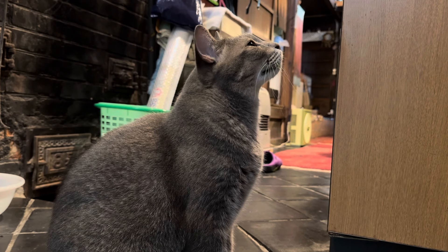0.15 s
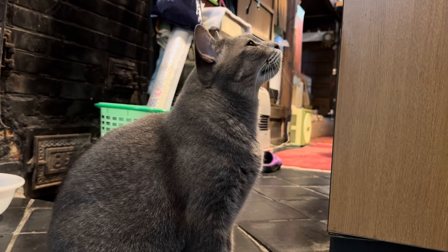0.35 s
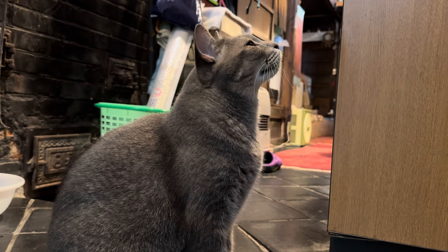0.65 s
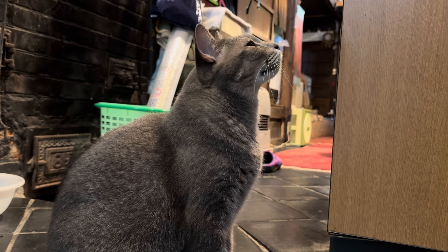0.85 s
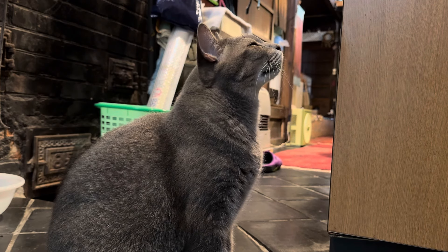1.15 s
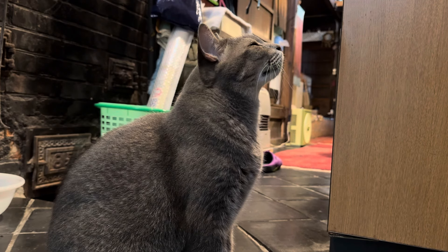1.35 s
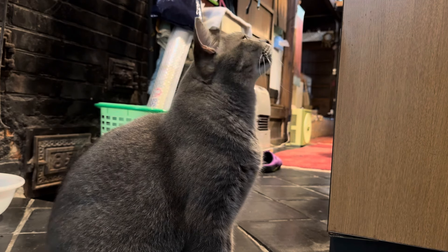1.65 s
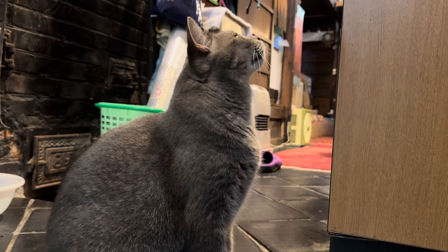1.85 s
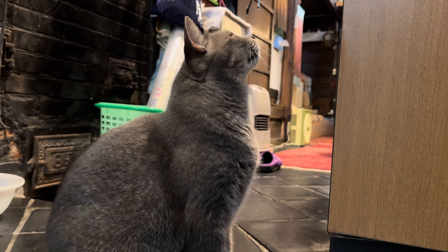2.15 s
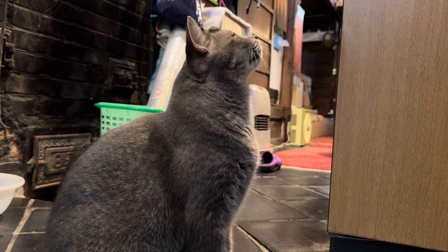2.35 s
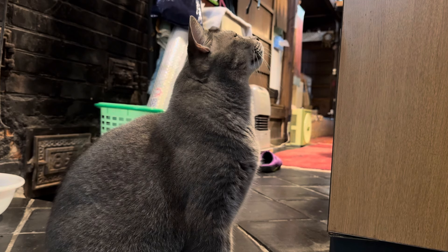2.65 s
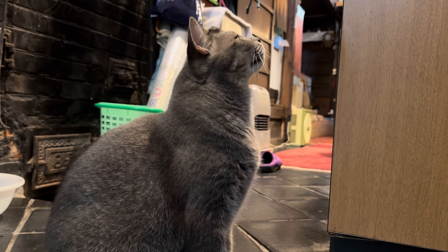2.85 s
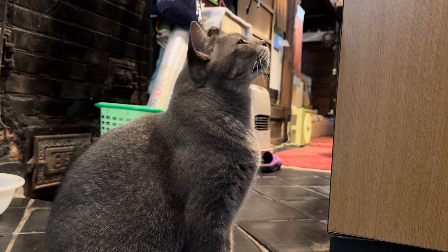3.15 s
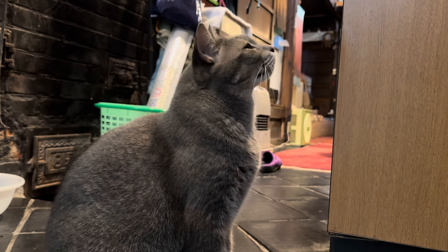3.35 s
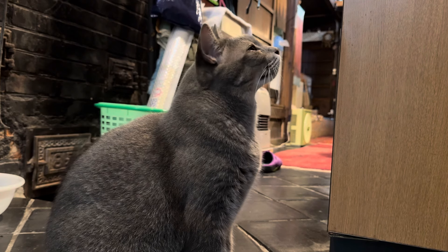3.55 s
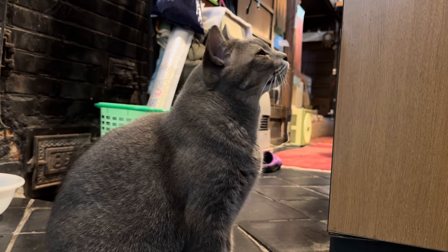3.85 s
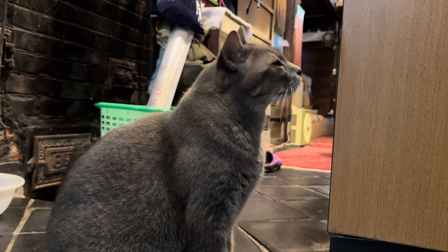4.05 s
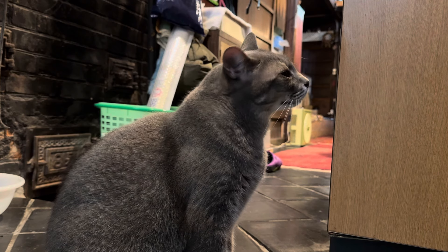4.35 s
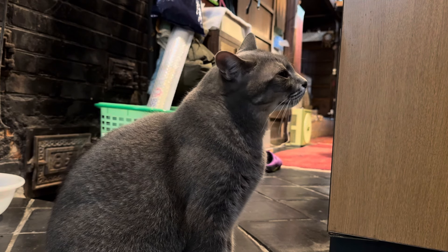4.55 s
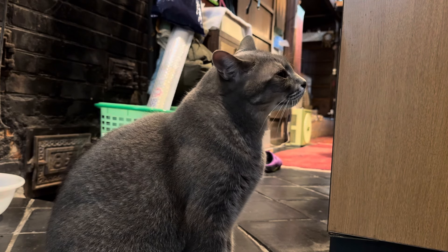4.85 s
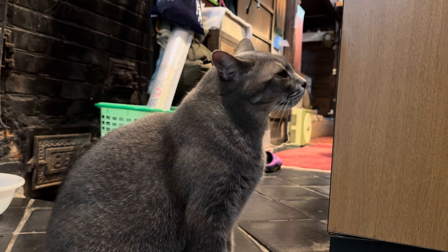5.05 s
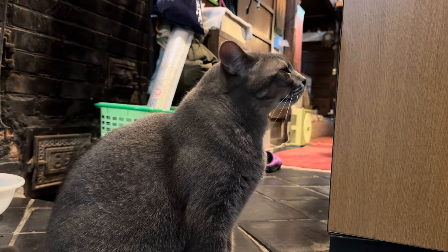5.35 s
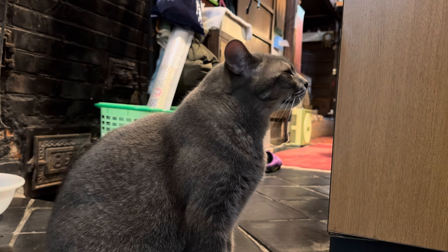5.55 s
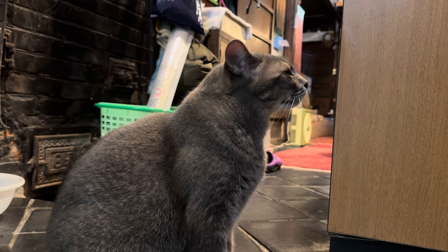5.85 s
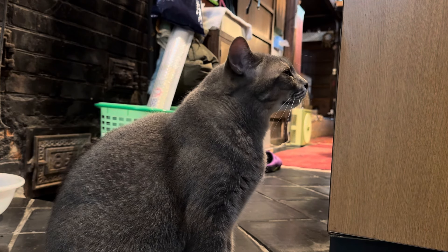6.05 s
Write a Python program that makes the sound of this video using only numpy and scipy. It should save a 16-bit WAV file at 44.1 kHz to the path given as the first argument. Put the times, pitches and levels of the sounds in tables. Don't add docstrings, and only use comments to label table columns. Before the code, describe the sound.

Close, low-placed stereo phone pickup in a small hard-surfaced kitchen with soft fridge hum. Two quick light wooden contacts, a faint sleeve hiss and thin distant chirps come first; then several woody knocks with low thumps and a jerky drawer slide. Crisp plastic film follows, crackling in bursts, popping and snapping, finally ripped in thick clusters with a brief lull near the end.

```python
import sys
import numpy as np
from scipy import signal
from scipy.fft import rfft, irfft, next_fast_len
from scipy.io import wavfile
from scipy.ndimage import uniform_filter1d, map_coordinates

SR = 44100
rng = np.random.default_rng(int(sys.argv[2]) if len(sys.argv) > 2 else 0)


def volts_from_db(level):
    exponent = np.asarray(level, float) / 20
    return 10 ** exponent


def store_pcm(level_fs):
    pcm = np.round(np.clip(level_fs, -1, 1) * 32767).astype(np.int16)
    wavfile.write(sys.argv[1], SR, np.atleast_2d(pcm).T)


N = 273420

# frequency in Hz, level in dB per Hz.
AIR = [(15, -60), (25, 2), (40, -0.5), (76, -3.5), (242, -6), (270, -25.5), (301, -2), (326, -10.5),
       (607, -19.5), (659, -13.5), (3080, -27), (5000, -30.5), (6050, -31.5), (6740, -26.5), (16000, -39)]
# frequency in Hz, level in dB.
FRIDGE_LINES = [(53.8, -92), (301.5, -80.5), (1389, -80.5)]

# start in seconds, clack in dB, then catch, rattle and tick in dB above it.
SET_DOWN = [
    (0.099, -46.5, -4, 0, -9),
    (0.103, -43, 1, -14.5, -14),
    (0.124, -46.5, -34, -10, -25),
    (0.287, -50, -33, -1.5, -7),
    (0.299, -51, -10.5, -9, -6.5),
    (0.311, -49.5, -6, -1, -17),
    (0.329, -48.5, -5, -10, -12),
]
# start in seconds, clack in dB, then edge, rattle and tick in dB above it.
KNOCKS = [
    (1.371, -36.5, 2.5, -4.5, -32),
    (1.375, -30, -10, -19, -44),
    (1.405, -37, -6, -15, -47),
    (1.68, -36.5, -6, -16.5, -31),
    (1.715, -54, -18, -30, -12),
    (1.941, -41, -8.5, -28, -33),
    (1.964, -50.5, -9, -24, -59),
    (2.272, -41.5, -10, -9.5, -33),
]
# frequency in Hz, level in dB per Hz.
SHELF_CLACK = [(250, 5), (360, 7), (500, -23), (800, 9), (1000, -4), (1500, -2), (2300, 5), (3200, -34),
               (6000, -25)]
DOOR_CLACK = [(250, 2.5), (400, 2), (520, -5), (650, 3.5), (800, -0.5), (1000, 4), (1200, -5), (1600, -2),
              (2300, -22), (3200, -19), (6000, -36)]
# centre in Hz, width in Hz, level in dB.
CATCH = [(870, 170, 1), (1405, 43, 11.8)]
DOOR_EDGE = [(1830, 780, 0), (2400, 760, 2)]
# frequency in Hz, level in dB per Hz.
RATTLE = [(1500, -0.5), (2800, -3.5), (5000, -3.5), (8000, -10.5), (12000, -60)]
SET_DOWN_S, KNOCK_S, THUD_S = 0.033, 0.2, 0.027

# start in seconds, boom in dB, then board, edge and ring in dB above it.
SHELF_THUDS = [
    (0.103, -62, 0, 16.5, 3),
    (0.113, -47, -3, -10, -15),
    (0.14, -71, 6, -3, -13),
    (0.299, -40, -2.5, 2, -5),
    (0.326, -51.5, 3, 4, 10),
    (0.345, -63.5, 1.5, -6, 3),
]
# centre in Hz, width in Hz, level in dB.
SHELF = [
    [(82.7, 28, 0)],
    [(145, 80, 0)],
    [(215, 73, 16), (357, 60, -13)],
    [(270, 24, 0)],
]
# start in seconds, boom in dB, then low panel, high panel and door in dB above it.
THUDS = [(1.373, -42, 2.5, 11, 9), (1.392, -38, -5.5, 4, -12), (1.42, -42.5, 8, -2, -8),
         (1.45, -56, 9, -18, -18), (1.505, -47, -1.5, -9, -22), (1.576, -52, -5, -5, -4.5),
         (1.682, -57.5, 10, 7, 21.5), (1.703, -34.5, -12.5, -10, -16), (1.745, -52, -2, 4, 1),
         (1.818, -51, -12, -33, -35), (1.945, -66, -8, 12, -1), (1.966, -45, -7, -2, -2),
         (2.029, -55.5, 1, 3, -10), (2.26, -68, 3.5, 14, 7), (2.274, -54, 0, 19, 10.5),
         (2.303, -48.5, -2, 7, -13), (2.475, -65.5, -13, -8, 18), (2.531, -38.5, -14, -34, -11),
         (2.598, -48.5, -15, 0, -30), (2.656, -65, -7, 11, -16), (2.705, -60.5, -8, 1, -2),
         (2.822, -69, 5, 13, 1), (2.93, -73, -6, 8.5, 0), (3.04, -77.5, -6, 14.5, 3),
         (3.2, -73.5, -2, 9, -5), (3.33, -73.5, -2, 9.5, 0), (3.467, -60, -9, -0.5, -19),
         (4.92, -76, 0, 8, 0), (5.1, -77.5, 7.5, 1, 8), (5.38, -76, 5, 9.5, 0), (5.55, -75.5, -1, 14.5, 0),
         (4.363, -76, -23, 15, 14), (6.115, -74.5, -5, 12.5, -1)]
# centre in Hz, width in Hz, level in dB.
BOOM = [(68.2, 27, 0)]
LOW_PANEL = [(110.5, 32.6, 0)]
PANEL = [(175.7, 52, 0)]
DOOR = [(264, 32, -2.5), (294.7, 41, 0.53)]

# start in seconds, level in dB.
CHIRPS = [(0.252, -70), (.44, -75), (.52, -81), (0.622, -72), (.79, -77), (.86, -78), (.92, -85),
          (0.99, -68), (1.22, -80), (1.828, -99), (1.87, -97), (1.905, -101), (1.944, -94), (2.05, -79),
          (2.085, -89), (2.17, -93), (5.968, -104)]
CHEEPS = [
    (.52, -97),
    (.96, -82),
    (1.09, -81),
    (1.23, -78),
]

# peak in seconds, crumple in dB, fizz in
# dB, swell in seconds, fade in seconds.
SQUEEZES = [(1.67, -59.5, -72.5, 0.12, 0.047), (2.15, -62, -70.5, 0.052, 0.63),
            (2.284, -61, -66.5, 0.076, 0.27), (2.34, -58.5, -66, 0.025, 0.52),
            (2.47, -48, -50.5, 0.091, 0.11), (2.6, -60, -62.5, 0.045, 0.035), (2.808, -81, -73, 0.12, 0.19),
            (2.92, -76, -73, 0.027, 0.1), (3.1, -60.5, -75, 0.29, 1), (3.25, -54, -67.5, 0.081, 0.067),
            (3.381, -51.5, -65, 0.016, 0.16), (3.539, -54.5, -69, 0.086, 0.032),
            (3.71, -48.5, -68, 0.061, 0.025), (3.78, -67.5, -88, 0.049, 1), (3.898, -57, -74, 0.029, 0.064),
            (3.919, -65, -62, 0.012, 0.051), (4.0, -62.5, -70.5, 0.072, 0.12),
            (4.1, -65, -67, 0.0091, 0.082), (4.19, -54, -55.5, 0.25, 0.23), (4.279, -49, -66, 0.019, 0.093),
            (4.33, -62, -72, 0.059, 0.07), (4.372, -55, -49, 0.0071, 0.049), (4.46, -79, -72, 0.02, 0.044),
            (4.514, -61, -59.5, 0.019, 0.068), (4.564, -47, -61, 0.03, 0.024),
            (4.63, -63, -69, 0.04, 0.087), (4.74, -56, -57, 0.12, 0.025),
            (4.885, -45.5, -51.5, 0.14, 0.049), (4.967, -55.5, -57.5, 0.0054, 0.2),
            (5.168, -50, -55.5, 0.031, 0.29), (5.225, -70, -71, 0.025, 0.026), (5.27, -68, -40, 0.019, 0.027),
         (5.316, -47.5, -50, 0.018, 0.035), (5.343, -46.5, -41.5, 0.029, 0.041),
         (5.38, -70, -55, 0.03, 0.024), (5.427, -43, -50, 0.038, 0.059), (5.466, -62, -52.5, 0.015, 0.042),
         (5.514, -61, -72, 0.016, 0.051), (5.569, -60, -56, 0.019, 0.022),
         (5.595, -78, -52.5, 0.022, 0.036), (5.645, -57, -59, 0.023, 0.12),
         (5.699, -47, -49.5, 0.14, 0.043), (5.744, -43, -55, 0.018, 0.032),
         (5.799, -49.5, -52.5, 0.031, 0.039), (5.84, -63, -72, 0.14, 0.11), (6.034, -60, -66, 0.0096, 0.3),
         (6.075, -53, -74, 0.039, 0.26), (6.128, -55, -51, 0.023, 0.057), (6.169, -43, -47, 0.08, 0.078)]
# frequency in Hz, level in dB per Hz.
CRUMPLE = [(120, -100), (240, -5), (400, -13), (777, 1), (1380, 5), (1890, 3.5), (2350, -0.5),
           (7500, -13.5), (9000, -0.5), (11700, -88), (19800, -120)]
FIZZ = [(3000, -24), (5500, -8), (7500, -1.5), (9000, -2.5), (10500, -1.5), (11600, 0), (13200, -2),
        (15500, -1.5)]

# time in seconds, speed as scrape level in dB.
SLIDE = [
    (2.3, -83),
    (2.36, -61.5),
    (2.44, -60),
    (2.488, -47),
    (2.542, -46),
    (2.61, -58),
    (2.66, -74.5),
    (2.8, -62.5),
]
# frequency in Hz, level in dB per Hz.
SCRAPE = [(300, -7), (600, -11), (1000, -1), (1800, -9), (2300, -1.5), (2650, -21), (3200, -13),
          (7000, -27.5)]

# time in seconds, peak in dB, flap in dB above it, flap in Hz, top octave against 8 kHz in dB.
SNAPS = [(2.4557, -35.5, -0.5, 980, -20), (2.8205, -39, 3, 1650, -7), (2.8204, -44, -0.5, 880, 4),
         (3.2507, -32.5, -6.5, 2180, 6), (3.2622, -34, -8.5, 2400, -5.5), (3.3085, -31, -8, 1520, -11),
         (3.3699, -34.5, -6, 1350, -3), (3.4423, -39, -8, 1090, -10), (3.4736, -26.5, -15.5, 890, 7),
         (4.093, -36, -7, 1860, -32), (4.177, -16.5, -18.5, 2350, 10.5), (4.3643, -20.5, -17.5, 2150, 11),
         (4.702, -35, -8.5, 3200, 1), (4.8274, -44, -9, 990, -20), (4.8374, -24.5, -15.5, 2950, 2),
         (4.9626, -24, -16.5, 4540, -0.5), (5.159, -35, -10, 2620, 2.5), (5.2245, -39.5, -1, 4400, 2),
         (5.2557, -28, -7, 2550, -4), (5.285, -29.5, -3, 3280, 19), (5.3163, -23.5, -2, 2380, -6),
         (5.375, -28, -6, 3120, 6), (5.4215, -29.5, -5.5, 3500, 5), (6.1244, -21.5, -11.5, 3450, 16),
         (6.166, -29.5, 2.5, 1660, 1)]
# time in seconds, peak in dB, flap in dB
# above it, flap in Hz.
POPS = [(2.6061, -40, -6, 745), (2.738, -48.5, -31, 970), (2.7504, -63, 11.5, 830),
        (2.7826, -62, 8.5, 1570), (2.704, -62, 11.5, 940), (3.086, -46, 0, 3020), (3.153, -51.5, 6.5, 3070),
        (3.6856, -50, -23, 3360), (3.7034, -47.5, 5.5, 1100), (3.782, -45.5, 3.5, 1700),
        (3.8538, -43.5, -4, 1530), (3.9128, -48, 1, 1700), (4.0378, -55, 7.5, 2380),
        (4.1298, -45, 1.5, 1770), (4.139, -58, 13, 900), (4.169, -45.5, 8, 2330), (4.2283, -42, 1, 1400),
        (4.271, -44.5, 7, 1750), (4.51, -50, -22, 1310), (4.5367, -56, 0, 2420), (4.5534, -52, 7, 1660),
        (4.4578, -56, 9, 2530), (4.401, -32.5, -11, 2960), (4.197, -37, -6, 1410), (4.6355, -47, -12, 2000),
        (4.7284, -48.5, 7.5, 2020), (3.0218, -58.5, 4, 2000), (3.067, -62, 12, 1800),
        (3.5193, -51, 2, 1200), (3.733, -47, -9, 2000), (3.757, -64, 8, 1600), (3.897, -63, 3, 1800),
        (3.9968, -47.5, 1, 2000), (5.5126, -43.5, 5, 3530), (4.87, -35.5, 4.5, 1760), (5.183, -40, 0, 3400),
        (5.2271, -46, 8.5, 1660), (5.464, -39, -5, 2980), (5.483, -44.5, 6.5, 2170),
        (5.594, -36.5, -8.5, 3000), (5.631, -47.5, 5, 3770), (5.745, -37.5, -2, 2940),
        (5.918, -53, -25, 2500), (5.6446, -39, -2, 3080), (5.671, -48, 7.5, 2510),
        (5.796, -47.5, 7.5, 2230), (6.06, -52.5, 9, 2010), (6.131, -26, -17, 3000), (6.102, -36, 0.5, 1530),
        (2.948, -59, 3, 1800), (3.2548, -36.5, -5, 2300), (3.314, -45, -26, 2500),
         (3.4759, -30.5, -4.5, 1500), (3.673, -66, 3, 1200), (4.097, -46.5, 0, 2500),
         (4.181, -34, -10, 2400), (4.305, -55, 2, 2000), (4.321, -56, 8, 1300), (6.137, -45, -12, 3000),
         (4.7067, -39, -5, 3000), (4.967, -26.5, -16.5, 3900), (6.151, -50, 10, 1420),
         (6.175, -48, 11.5, 1980), (6.184, -49, 13, 1600), (5.57, -43, -3, 3000)]

# frequency in Hz, decay by 60 dB in seconds.
KITCHEN = [(100, 0.33), (500, 0.35), (3000, 0.27), (6000, 0.17), (8500, 0.17), (15000, 0.13)]
# delay in seconds, level in dB.
WALLS = [(.0022, -5.5), (.0058, -15.5), (.0072, -11.5), (0.01, -40), (0.023, -54), (0.022, -61)]
# frequency in Hz, level in dB.
WET = [(300, 6.5), (1500, -4), (2800, 2), (5500, 4.5), (8000, 1), (15000, -3.5)]

# frequency in Hz, likeness from 0 to 1.
ALIKE = [(60, .88), (250, .72), (700, .3), (1700, .35), (2700, .15), (3600, .4), (5900, .05), (7600, .8),
         (8500, .9), (9800, .84), (11500, .76), (15500, .72)]
# frequency in Hz, lead in radians.
LEAD = [(0, 0), (700, -1.3), (1700, -1.7), (2400, -1.2), (3200, 1.7), (3800, 1.5), (5200, -.6),
        (6500, -4.5), (8400, -3.2), (9700, -3.65), (12000, -4.2), (15800, -5.9)]
# frequency in Hz, difference in dB.
LEFT = [(60, .5), (300, 2.5), (800, -.5), (1400, -2), (2300, 3), (5000, 3.5), (7400, 5.5), (8700, .5),
        (12000, -.5), (15000, 0)]
# frequency in Hz, gain in dB.
PASS_BAND = [(20, -26), (28, -16), (40, -8), (52, 0), (15650, 0), (16100, -16), (16900, -40), (17200, -90)]


def unit(x):
    return x / np.sqrt(np.mean(x ** 2) + 1e-20)


def along(points, hz):
    f, v = np.transpose(points)
    return np.interp(np.log(hz + 1), np.log(f + 1), v)


def filtered(x, response):
    m = next_fast_len(x.shape[-1] + SR // 2)
    return irfft(rfft(x, m) * response(np.fft.rfftfreq(m, 1 / SR)), m)[..., :x.shape[-1]]


def coloured(x, spectrum):
    return filtered(x, lambda hz: volts_from_db(along(spectrum, hz)))


def ringing(x, modes):
    def body(f):
        total = 0
        for k, (centre, width, db) in enumerate(modes):
            damping = 1j * f * width
            total = total + (-1) ** k * volts_from_db(db) * damping / (centre ** 2 - f ** 2 + damping)
        return total
    return unit(filtered(x, body))


def drift(rate_hz):
    return map_coordinates(rng.standard_normal(N), [np.arange(N) * rate_hz / SR])


def unlike(pair):
    def shares(hz):
        turn = np.arccos(np.clip(along(ALIKE, hz), 0, 1)) / 2
        return np.array([np.cos(turn), np.sin(turn)])
    mid, side = filtered(pair, shares)
    return np.array([mid + side, mid - side])


def contacts(rows, length, bodies, offsets_db, lasting, rise, firm):
    out, t = np.zeros(N + SR), np.arange(SR // 2) / SR
    decay_s = np.clip(length * np.c_[lasting], .01, .5)
    envelope = volts_from_db(-60 * t / decay_s) * (1 - np.exp(-t / rise))
    for s, db, *rel_db in rows:
        push = (firm + rng.standard_normal((len(bodies), len(t)))) * envelope
        parts = [unit(body(p)) for body, p in zip(bodies, push)]
        out[round(s * SR):][:len(t)] += volts_from_db(db + np.add([0, *rel_db], offsets_db)) @ parts
    return out[:N]


def clacks(rows, length, clack, modes, offsets_db, lasting):
    bodies = [lambda p: coloured(p, clack), lambda p: ringing(p, modes),
              lambda p: coloured(p, RATTLE), lambda p: coloured(p, FIZZ)]
    return contacts(rows, length, bodies, offsets_db, lasting, rise=0.0018, firm=0)


def blows(rows, parts):
    bodies = [lambda p, modes=modes: ringing(ringing(p, modes), modes) for modes in parts]
    return contacts(rows, THUD_S, bodies, [-18.5, -13.5, -18, -18.0], lasting=[1.2, 1.3, 0.47, 0.74],
                    rise=0.001, firm=0.6)


def patchy(pair, patchy_db):
    z = signal.stft(pair, nperseg=512)[2]
    field = rng.standard_normal(z.shape[1:])
    for axis in (0, 1):
        field = uniform_filter1d(field, size=14, axis=axis)
    return signal.istft(z * volts_from_db(patchy_db * unit(field)), nperseg=512)[1][:, :N]


def background():
    noise = patchy(rng.standard_normal((2, N)), patchy_db=1.4)
    out = volts_from_db(-64.5) * unit(unlike(coloured(noise, AIR)))
    t = np.arange(N) / SR
    for hz, db in FRIDGE_LINES:
        out = out + volts_from_db(db + 5.7 * drift(9)) * np.sin(2 * np.pi * hz * t + 1.7 * drift(9))
    return out


def set_down():
    return clacks(SET_DOWN, SET_DOWN_S, SHELF_CLACK, CATCH, [-24.5, -13.5, -17.5, -10.0],
                  lasting=[0.66, 0.66, 2.7, 4.1])


def shelf_thuds():
    return blows(SHELF_THUDS, SHELF)


def bird():
    out, t = np.zeros(N + SR), np.arange(SR // 5) / SR
    rise = t / 0.012
    envelope = rise * np.exp(1 - rise)
    for calls, hold_hz, fall_hz, rough_hz in (CHIRPS, 6550, 420, 60), (CHEEPS, 4950, 300, 330):
        for s, db in calls:
            waver = unit(uniform_filter1d(rng.standard_normal(len(t)), size=100))
            hz = hold_hz + fall_hz * np.exp(-t / 0.0144) + rough_hz * waver
            out[round(s * SR):][:len(t)] += volts_from_db(db) * envelope * np.sin(2 * np.pi * np.cumsum(hz) / SR)
    return out[:N]


def sleeve():
    since = np.clip(np.arange(N) / SR - 0.72, 0, None)
    hold = volts_from_db(-72) / (1 + (since / 0.34) ** 8)
    touch = volts_from_db(-56.5 - 60 * since / 0.085)
    hiss = coloured(rng.standard_normal(N), [(1500, -28), (3500, -17), (7500, -4.5), (12000, 4.0), (15500, -2.0)])
    return (1 - np.exp(-since / 0.0065)) * (hold + touch) * unit(hiss)


def knocks():
    return clacks(KNOCKS, KNOCK_S, DOOR_CLACK, DOOR_EDGE, [-20.0, -22.5, -22.0, -10.5],
                  lasting=[1.27, 0.48, 2.5, 1.0])


def thuds():
    return blows(THUDS, (BOOM, LOW_PANEL, PANEL, DOOR))


def squeezes():
    s, crumple_db, fizz_db, swell, fade = np.transpose(SQUEEZES)[:, :, None]
    t = np.arange(0, N, 32) / SR
    shape_db = -20 * np.maximum((s - t) / swell, (t - s) / fade)
    return [np.interp(np.arange(N) / SR, t, volts_from_db(db + shape_db).sum(axis=0)) for db in (crumple_db, fizz_db)]


def swarm(rate, spread_db, clump_db):
    when, how_big, sign = rng.random((3, N))
    clumps = volts_from_db(clump_db * drift(45))
    size = volts_from_db(-spread_db * np.log(how_big + .03)) * np.sign(sign - .5)
    return clumps * size / (1 + np.exp(np.clip((when * SR / rate - 1) * 30, -50, 50)))


def crackle():
    crumple, fizz = squeezes()
    fine = swarm(rate=1004, spread_db=3.5, clump_db=3.5)
    coarse = swarm(rate=554.0, spread_db=4.5, clump_db=3.0) + 0.3 * fine
    sliding = 0.46 * rng.standard_normal(N)
    dull = unit(coloured(coarse, CRUMPLE))
    bright = unit(coloured(unit(fine) + sliding, FIZZ))
    return volts_from_db(-4.0) * crumple * dull + volts_from_db(4.0) * fizz * bright


def drawer():
    t, speed_db = np.transpose(SLIDE)
    scrape = volts_from_db(np.interp(np.arange(N) / SR, t, speed_db, -140, -140))
    load_db = -42
    load = scrape / volts_from_db(load_db)
    boom = volts_from_db(-62.5) * load ** 0.32
    panel = volts_from_db(-4 + load_db) * load ** 1.27
    rub = rng.standard_normal((3, N)) * volts_from_db(3.1 * drift(60))
    wood = PANEL + DOOR
    rumble = boom * ringing(rub[0], BOOM) + panel * ringing(ringing(rub[1], wood), wood)
    return rumble + scrape * unit(coloured(rub[2], SCRAPE))


def snaps():
    layers, t = np.zeros((3, N + SR)), np.arange(SR // 20) / SR
    creases = [(*snap, 0.78) for snap in SNAPS] + [(*pop, -2, 0.285) for pop in POPS]
    for s, db, low_db, hz, sharp_db, click in creases:
        hiss, shake = rng.standard_normal((2, len(t)))
        tick = click * (t == 0) + 0.29 * hiss * volts_from_db(-60 * t / 0.0062)
        swing = np.cos(2 * np.pi * hz * t) + 0.41 * shake
        flap = swing * volts_from_db(-60 * t * hz / 7) * (1 - np.exp(-t / 0.0002))
        flap = flap / np.linalg.norm(flap) * np.sqrt(SR / hz)
        film_db = db + 13.5 - max(sharp_db, 0)
        edge_db = db + 9.5 + min(sharp_db, 0)
        sizes = volts_from_db([film_db, edge_db, db + low_db + 3.5])
        layers[:, round((s - .0016) * SR):][:, :len(t)] += sizes[:, None] * [tick, tick, flap]
    film = coloured(layers[0], [(3000, -37.0), (6200, -7.0), (7800, 7.0), (9800, 7.0), (11500, -3.0), (13000, -12.0)])
    edge = coloured(layers[1], [(8000, -37.0), (10000, -6.0), (11500, 7.5), (13200, 9.0), (15500, 4.0)])
    flaps = coloured(layers[2], [(100, -84), (250, -6.0), (900, -1.0), (2000, -0.5), (6000, 12), (9000, -26)])
    return (film + edge + flaps)[:N]


def kitchen(x, wet_db):
    out, step = np.zeros((2, N + SR)), SR // 6
    for start in range(0, N, step):
        hz, t, z = signal.stft(rng.standard_normal((2, SR // 2)), SR, nperseg=256)
        decay_db = along(WET, hz) - 60 * t[:, None] / along(KITCHEN, hz)
        tail = signal.istft(z * volts_from_db(decay_db.T), SR, nperseg=256)[1]
        paths = np.pad(volts_from_db(wet_db) * tail / np.linalg.norm(tail[0]), ((0, 0), (150, 0)))
        scatter = irfft(np.r_[0, np.exp(2j * np.pi * rng.random(32))])
        for s, db in [(0.002095, 0.048)] + WALLS:
            paths[0, round(s * SR)] += volts_from_db(db)
            paths[1, round(s * SR):][:len(scatter)] += volts_from_db(db) * scatter
        heard = signal.fftconvolve(x[None, start:start + step], paths, axes=1)
        out[:, start:][:, :heard.shape[1]] += heard
    return unlike(out[:, :N])


def ducking(near):
    keep = np.exp(-1 / (0.98 * SR))
    memory = signal.lfilter([1 - keep], [1, -keep], np.mean(near ** 2, axis=0)) / volts_from_db(-81) ** 2
    return volts_from_db(-2 * memory / (1 + memory))


def scene():
    hard = set_down() + knocks() + drawer()
    soft = shelf_thuds() + thuds()
    wood = kitchen(volts_from_db(1.5) * hard, wet_db=-5.0) + kitchen(soft, wet_db=-16.0)
    rustle = kitchen(volts_from_db(-4.0) * crackle() + sleeve() + bird(), wet_db=1.5)
    creases = kitchen(volts_from_db(-5.0) * snaps(), wet_db=-3.5)
    near = wood + rustle + creases
    return near + ducking(near) * background()


def roll_off(x):
    return signal.sosfilt(signal.butter(12, 16980, fs=SR, output="sos"), x)


def record(dry):
    f, lead = np.transpose(LEAD)

    def port(hz):
        return volts_from_db(along(LEFT, hz) / 2) * np.exp(.5j * np.interp(hz, f, lead))
    ports = filtered(coloured(dry, PASS_BAND), lambda hz: np.array([port(hz), 1 / port(hz)]))
    return roll_off(ports)


dry = scene()
out = record(dry)
store_pcm(out)
```